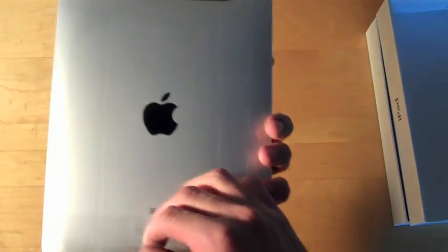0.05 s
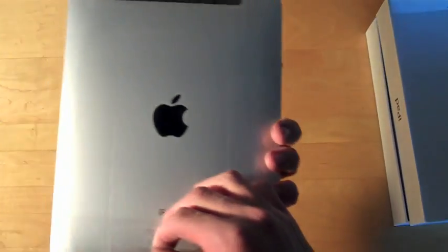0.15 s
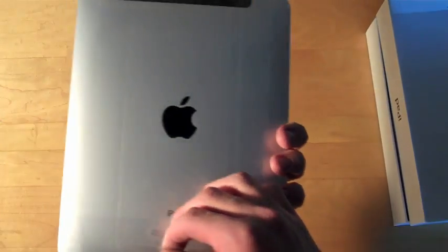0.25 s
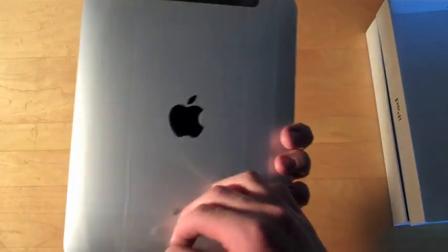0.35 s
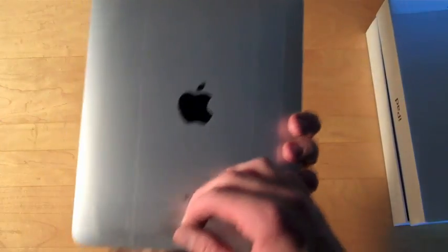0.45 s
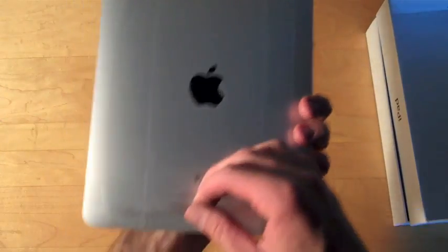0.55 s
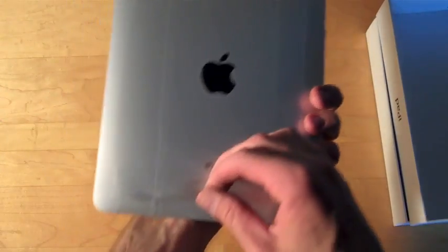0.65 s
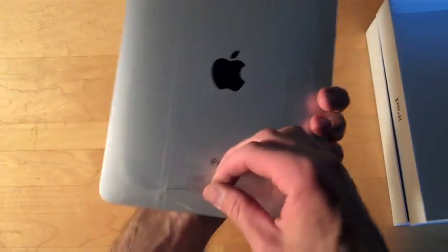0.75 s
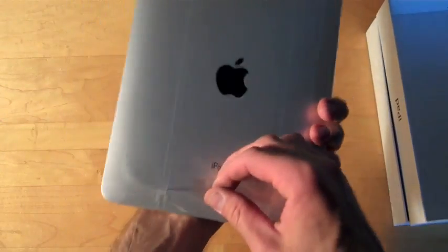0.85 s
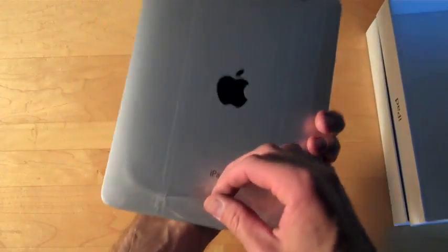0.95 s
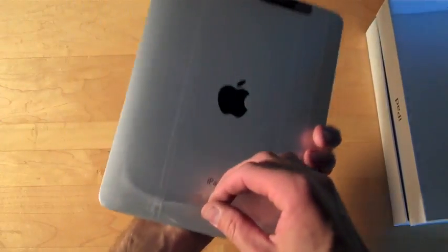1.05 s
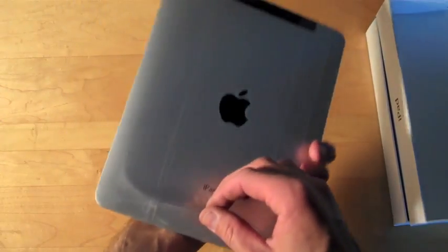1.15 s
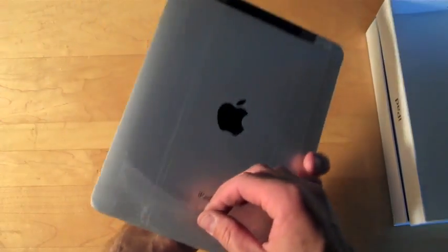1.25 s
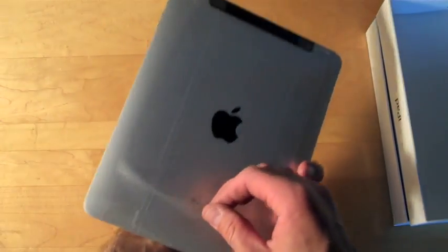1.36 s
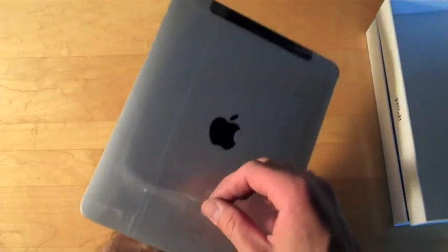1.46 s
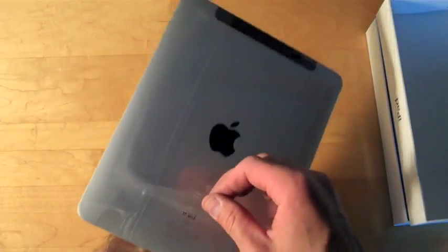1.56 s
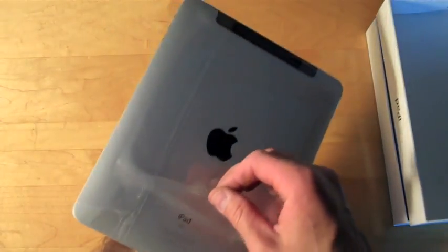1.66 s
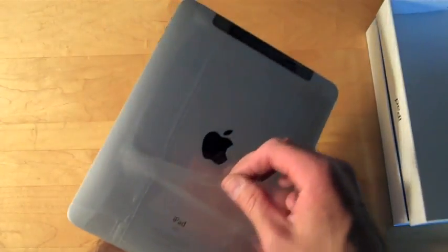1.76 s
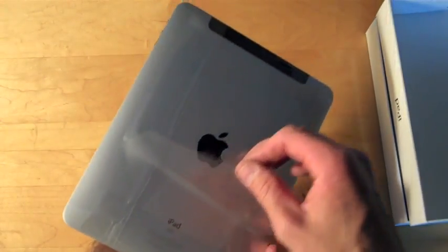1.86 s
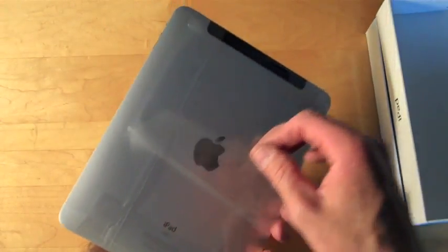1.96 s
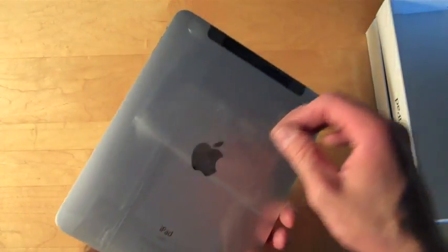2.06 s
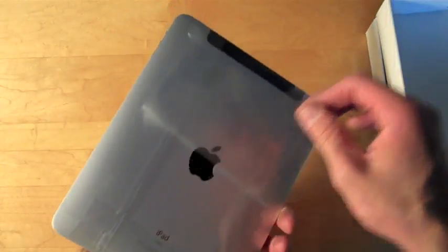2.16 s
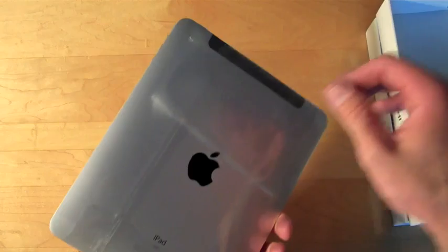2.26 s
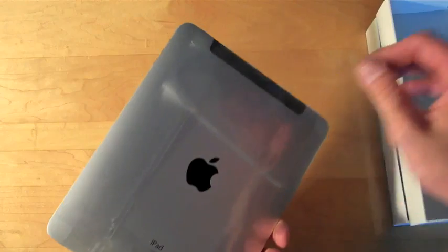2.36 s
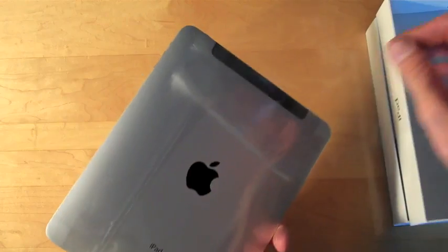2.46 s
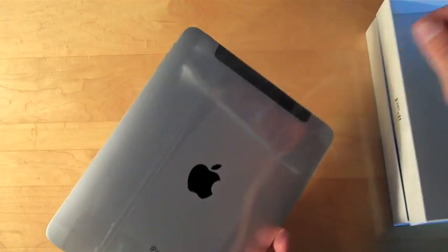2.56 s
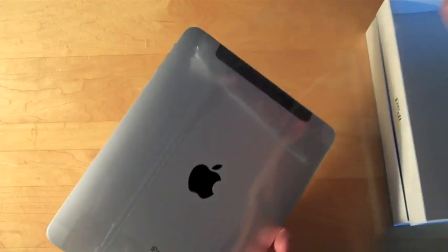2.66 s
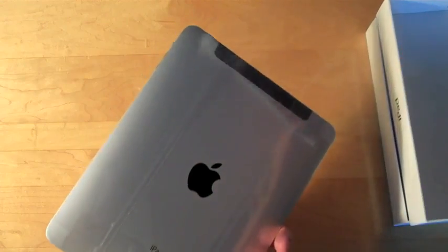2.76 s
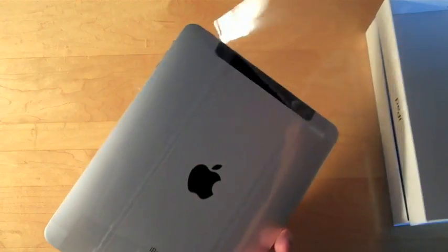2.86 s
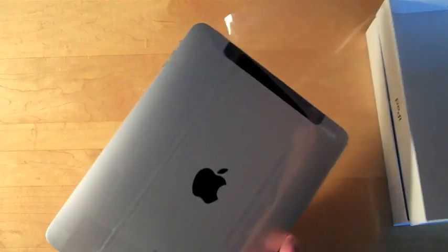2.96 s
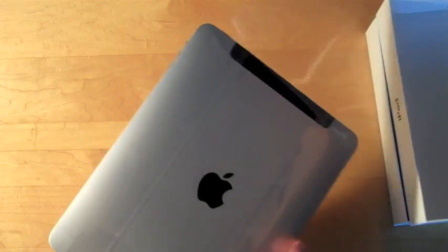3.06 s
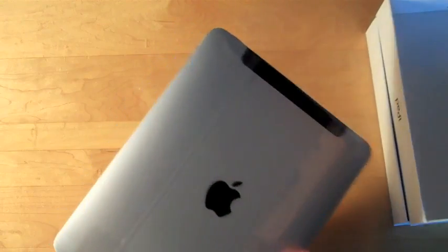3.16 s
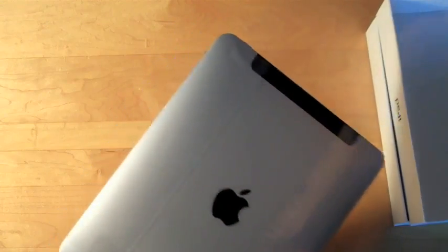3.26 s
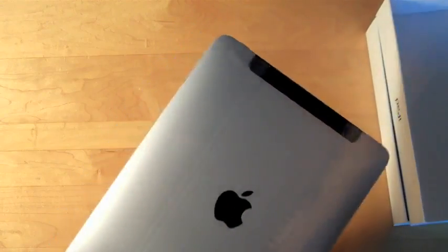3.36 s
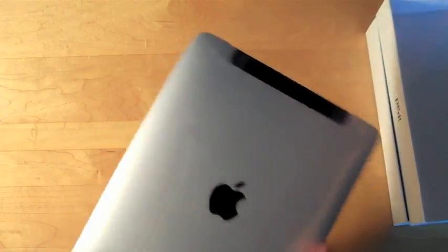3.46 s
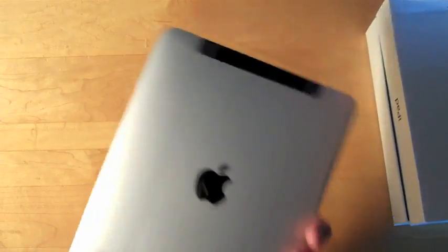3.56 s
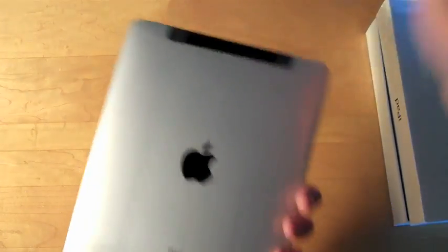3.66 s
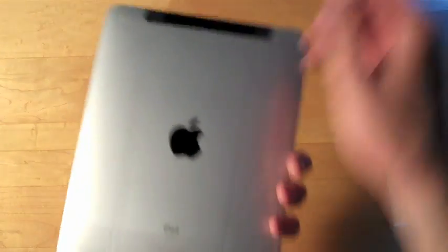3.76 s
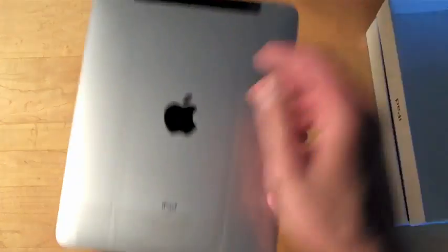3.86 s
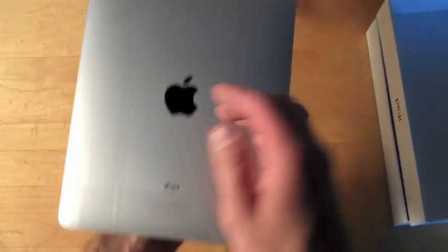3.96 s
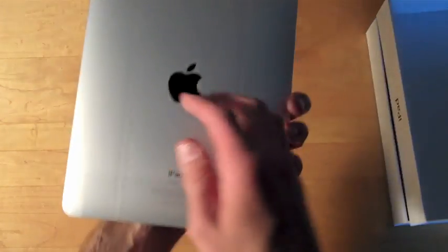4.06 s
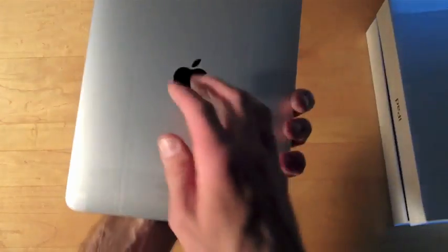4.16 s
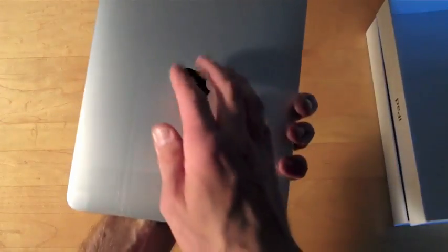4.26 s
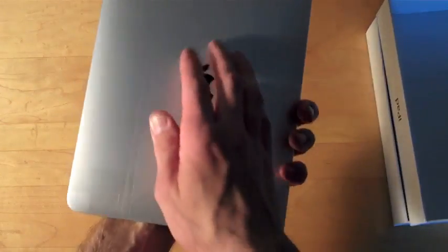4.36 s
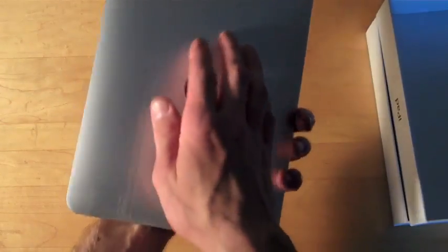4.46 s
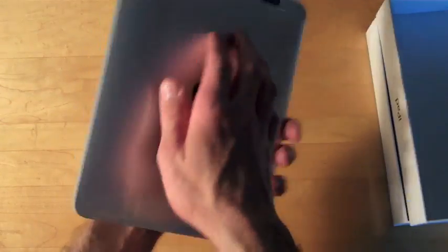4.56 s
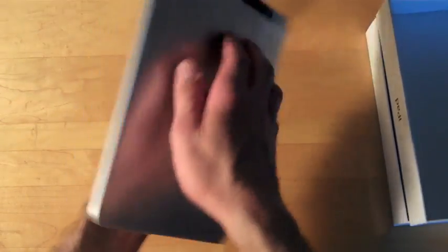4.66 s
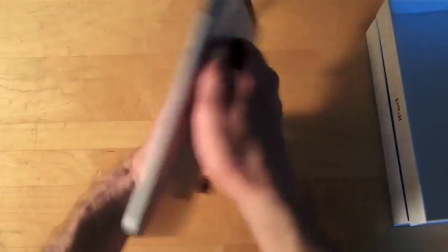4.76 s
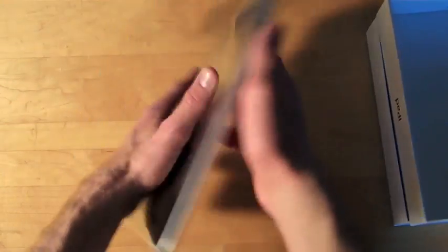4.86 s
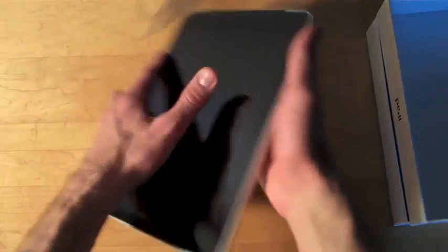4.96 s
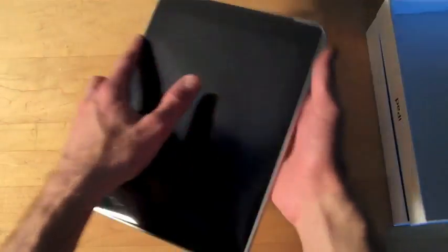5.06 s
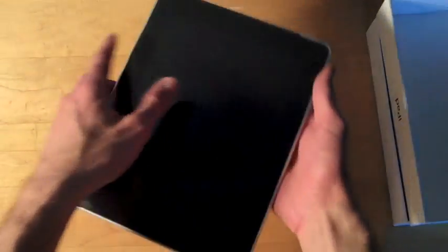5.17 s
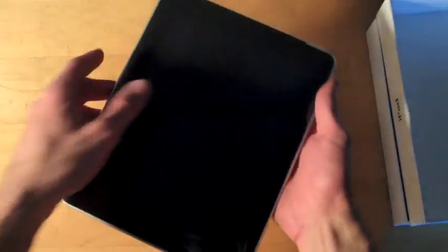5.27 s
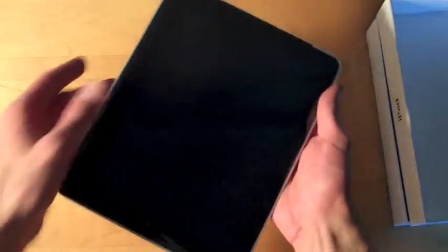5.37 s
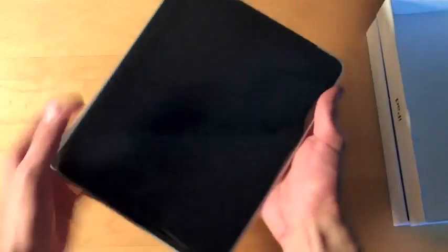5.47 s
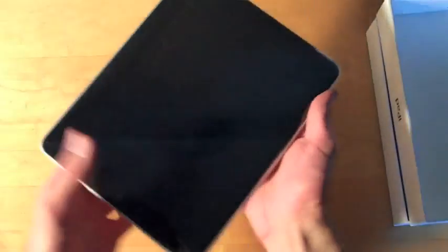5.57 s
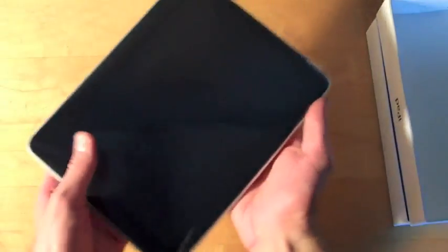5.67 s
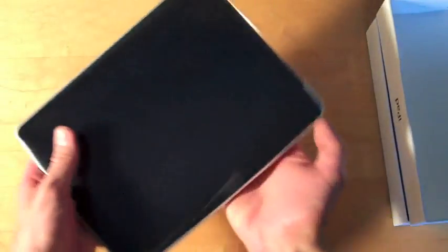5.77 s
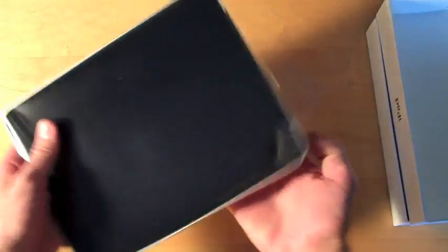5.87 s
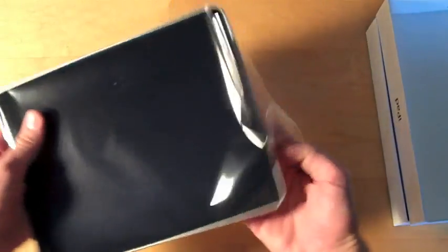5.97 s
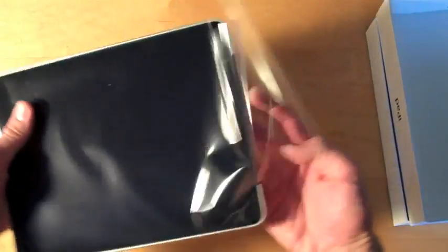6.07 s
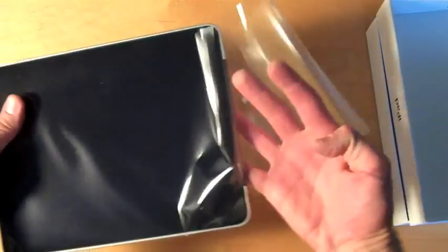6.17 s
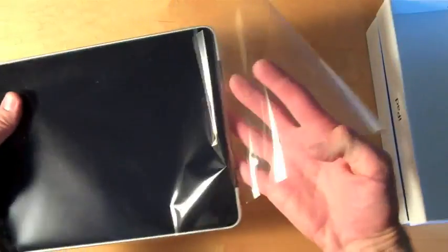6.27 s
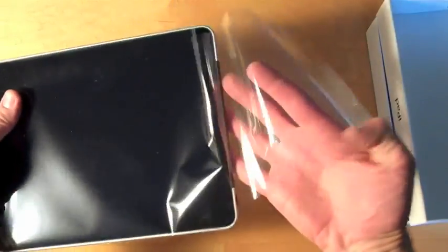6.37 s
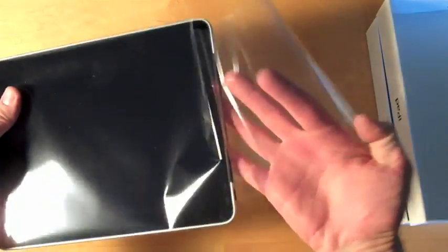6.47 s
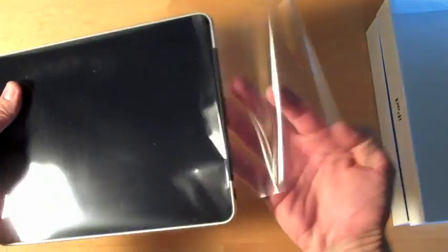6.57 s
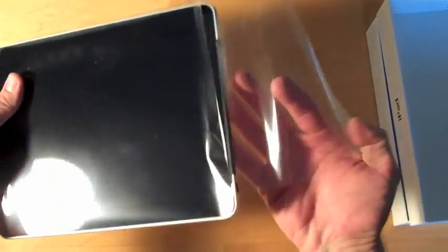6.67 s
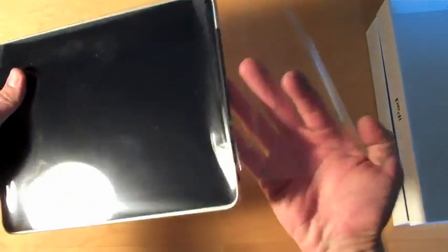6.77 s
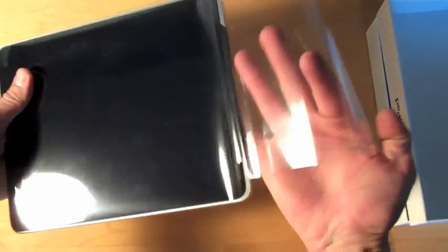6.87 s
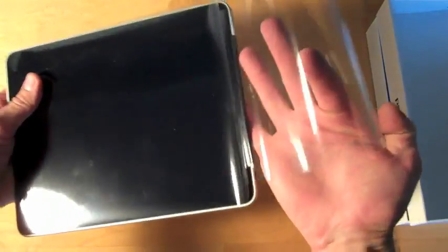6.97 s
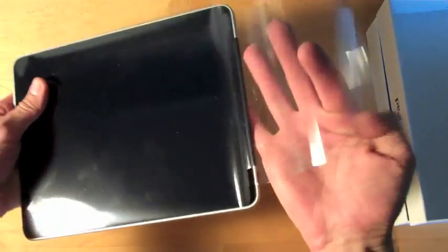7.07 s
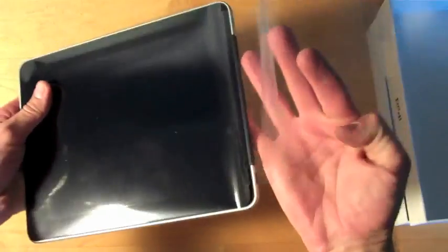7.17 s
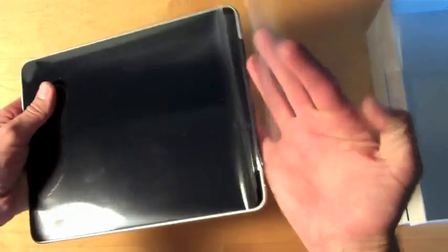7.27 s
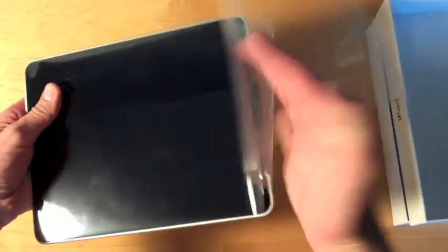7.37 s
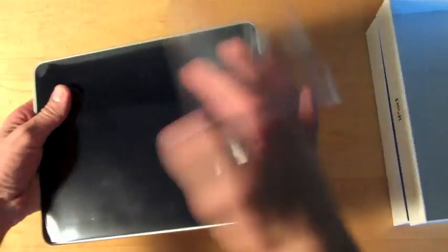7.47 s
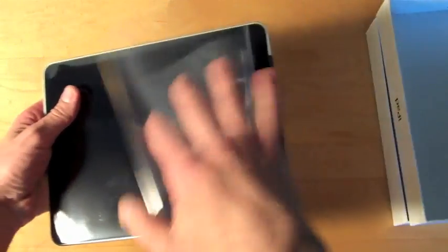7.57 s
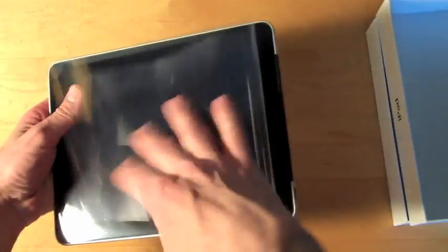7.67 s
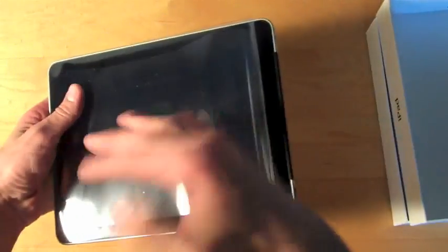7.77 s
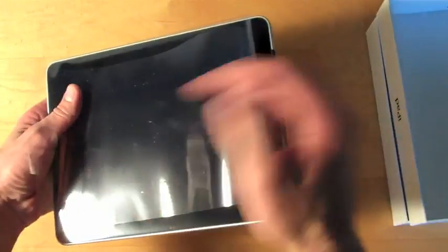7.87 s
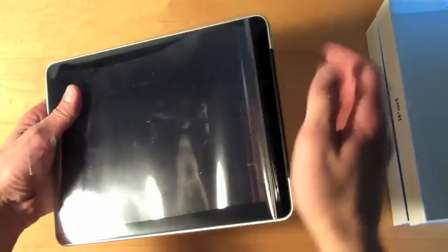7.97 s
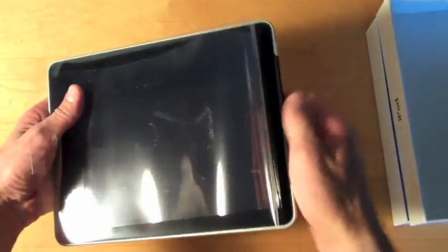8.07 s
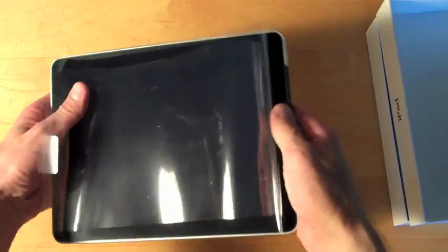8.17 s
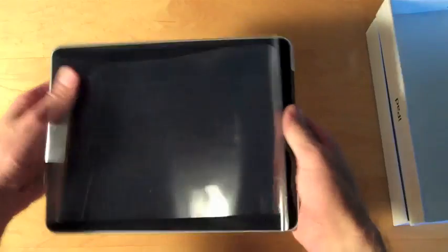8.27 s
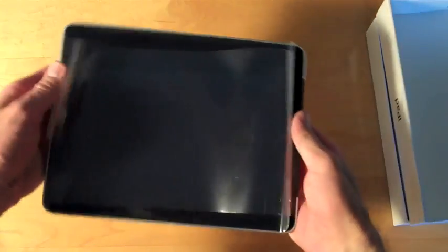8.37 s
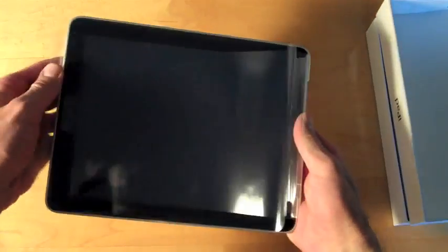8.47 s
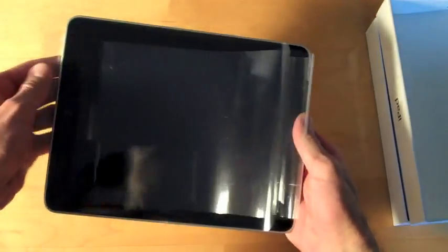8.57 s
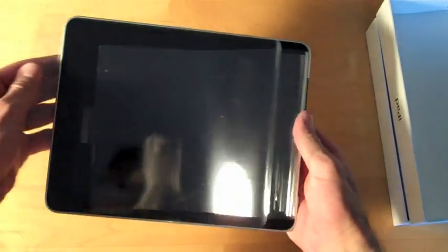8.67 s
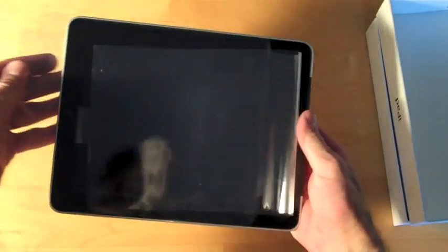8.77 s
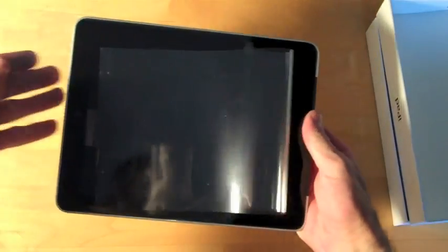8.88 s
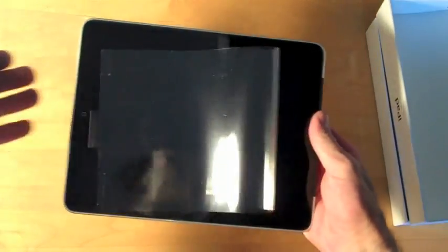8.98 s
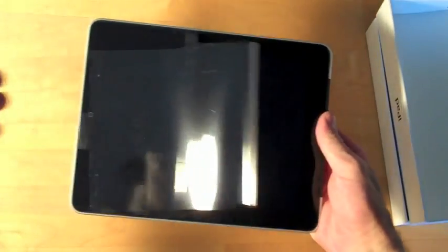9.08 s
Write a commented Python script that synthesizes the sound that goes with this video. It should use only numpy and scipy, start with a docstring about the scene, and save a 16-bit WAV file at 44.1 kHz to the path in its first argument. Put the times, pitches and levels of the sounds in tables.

```python
"""Close up in a small quiet room above a wooden desk, hands hold a tablet and its film begins to rustle and snap.
From 1.5 s the film peels away in quickening jerks, which join a hissing, singing pull until 3.2 s.
Then strokes of hand and film hiss and tick over the case, with dull grip rumble and grainy skin scuffs.
Throughout, creases buckle as ringing bursts of quick slips; now and then the whole sheet flaps with a hollow pop.
Hiss is noise made of tiny releases, coloured and swept by film resonances; echoes and a noise tail give the room."""
import sys
import numpy as np
from scipy import signal
from scipy.fft import rfft, irfft, next_fast_len
from scipy.io import wavfile
from scipy.ndimage import uniform_filter1d

SR = 44100
rng = np.random.default_rng(int(sys.argv[2]) if len(sys.argv) > 2 else 0)


def wav_out(sig):
    """Save sig, one row per channel (or a flat mono array), as 16-bit PCM at SR to the path in sys.argv[1]."""
    wavfile.write(sys.argv[1], SR, np.round(np.clip(np.atleast_2d(sig).T, -1, 1) * 32767).astype(np.int16))


N = 401751

# All levels are relative: layer trims, the room and the channel balance come on top.
# still room, noise spectrum: f/Hz, level/dB
QUIET_COLOUR = [(15, -15), (25, -0.5), (120, -3), (300, -6), (1200, -8.5), (5000, -12.5), (11000, -23),
                (16000, -61)]
QUIET_DB = -61.5
# decay of the room tail: f/Hz, t60/s
ROOM_DECAY = [(200, 0.25), (500, 0.6), (1400, 0.38), (4000, 0.25), (10000, 0.25)]
# echoes from desk and case: nominal delay/s, level/dB
ECHOES = [(.0019, -12), (.0046, -17), (.0058, -18)]
# steady resonances of desk and room: f/Hz, level/dB before scaling by frequency, t60/s
HOLLOW_MODES = [(351, -40, 0.54)]
# how unlike the film reaches the two channels: f/Hz, side level/dB
FILM_WIDTH = [(400, -23), (2000, -10.5), (9000, -6)]
# hands shifting their grip on the case: t/s, length/s, level/dB
GRIPS = [(0.0, 0.58, -63.5), (5.6, 0.078, -60.5), (8.604, 0.85, -65.5)]
# spectrum of the grip rumble: f/Hz, level/dB
GRIP_COLOUR = [(25, -11), (70, -3.5), (120, -4), (220, -10), (600, -42)]
# a fingertip dragging on the film: t/s, length/s, level/dB, pitch f/Hz
RUBS = [(0.508, .012, -45.5, 614), (3.887, 0.028, -47.5, 1410), (6.286, 0.021, -46.5, 1870),
        (6.778, 0.051, -47.5, 1680), (7.214, 0.053, -47, 1880), (7.328, 0.059, -46.5, 1530),
        (7.732, 0.037, -48, 1900), (8.482, 0.049, -47, 1410)]
# the whole sheet flapping: t/s, level/dB over 5 ms
FLAPS = [(2.299, -39), (2.797, -33), (2.877, -36.5), (3.2044, -18), (6.011, -36), (6.124, -28.5),
         (7.23, -43), (8.359, -43), (8.677, -43.5), (9.046, -44.5)]
# hollow modes of the flapping sheet: nominal f/Hz, level/dB, t60/s
SHEET_MODES = [(371, 7.5, 0.055), (438, 8.5, 0.063), (577, 5.5, 0.041), (1190, 7.5, 0.022)]
# tiny creases, single or in short runs: t/s, nominal level/dB over 5 ms, nominal ring f/Hz, length/s
CRINKLES = [(0.156, -45, 5600, .003), (0.428, -51, 5000, .012), (0.619, -46.5, 7000, .003),
            (0.685, -43.5, 4500, .018), (1.265, -42.5, 5400, .02), (1.297, -39, 3500, .012),
            (1.339, -51, 3000, .022), (2.769, -40.5, 3870, .012), (2.79, -33, 4700, .003),
            (3.499, -46.5, 5500, .0066), (3.736, -46.5, 4650, .005), (3.948, -48.5, 6150, .0071),
            (4.069, -42.5, 2680, .014), (4.16, -48, 4500, .006), (5.921, -46, 2300, .05),
            (5.98, -34.5, 2800, .003), (6.004, -38.5, 2300, .025), (6.053, -33, 1700, .003),
            (6.388, -44.5, 3300, .003), (7.206, -39.5, 3500, .003), (7.326, -45.5, 3500, .003),
            (7.644, -50.5, 2600, .009), (7.674, -47.5, 3500, .01), (7.745, -46.5, 3000, .021),
            (7.821, -35, 2400, .003), (8.226, -46.5, 2530, .003), (8.401, -43, 4850, .01),
            (8.427, -38.5, 6000, .003)]
# the film coming free in stick-slip jerks: t/s, nominal jerk level/dB over 5 ms
SLIPS = [(1.51, -60), (1.6, -51.5), (1.68, -49), (1.79, -59), (2.16, -50.5), (2.28, -41)]
FIRST_SLIPS_PER_S, SLIP_DOUBLING_S = 66, 0.32  # the rate of jerks doubles in this time
# resonances of the taut film, gliding as its free length changes: t/s, bright ring f/Hz, low bending f/Hz
FILM_PITCHES = [(1.66, 5380, 1675), (1.78, 6250, 1300), (2.17, 6530, 1200), (2.6, 7400, 884),
                (3.7, 4520, 1580), (5.9, 2820, 1350), (8.65, 4040, 613), (8.95, 8000, 547)]
# the film singing during the pull: t/s, bright ring level/dB, low bending level/dB
SINGING = [(1.62, -49, -54.5), (1.8, -60, -58.5), (2.18, -60, -52.5), (2.72, -59, -93)]
# the long pull that peels the back: t/s, hiss level/dB, flexing body/dB and fine fizz/dB relative to the hiss
PEEL = [(1.609, -58, -24, 1.5), (1.87, -56, -7, -5), (2.02, -43, -9.5, -4), (2.29, -46.5, -3, -9),
        (2.36, -49.5, -5, -8), (2.7, -49, -7.5, -6.5), (2.82, -48, 7.5, -3.5), (2.97, -57.5, -0.5, -9)]
PEEL_END_S = 3.2
# strokes of hand or film over the case: t/s, length/s, hiss level/dB, body/dB and fizz/dB relative to the hiss
STROKES = [(0.0, 0.44, -60.5, 5.5, -6), (0.454, 0.39, -58, 2.5, -5.5), (3.492, 0.49, -63, -1, 1),
           (3.637, 0.064, -52, -31, -6), (4.064, 0.07, -56, -3, -6), (4.32, 0.5, -66.5, 4, 3),
           (4.79, 0.093, -50.5, -5.5, -3), (4.987, 0.12, -57, 5, -8), (5.243, 0.1, -57, 0, -2),
           (5.576, 0.28, -63, -1, 2), (5.89, 0.042, -52.5, -0.5, -2.5), (5.924, 0.24, -48.5, 0.5, 1),
           (6.18, 0.44, -56.5, -3, -6.5), (6.67, 0.041, -50, -11, -4), (6.824, 0.15, -53, -9, -3),
           (7.116, 0.1, -51.5, -4, -6), (7.27, 0.57, -62.5, 1, -4), (8.152, 0.26, -58.5, -7, -0.5),
           (8.375, 0.3, -45.5, -19, -3), (8.727, 0.36, -49, -10, -2), (8.815, 0.24, -50, -44, 6.5)]
# a stroke takes hold over a share of its length, swells towards its middle and lets go
GRAB_SHARE, LET_GO_S, SWELL_DB = 0.028, 0.051, 2
# spectra of the sliding film's hiss, flexing body and fine fizz: f/Hz, level/dB
HISS_COLOUR = [(900, -20.5), (1600, -6.5), (3300, 0), (6200, 0), (7500, -8), (11000, -51.5)]
BODY_COLOUR = [(60, -33), (250, -2), (340, 0), (450, 1), (800, -6.5), (1150, -5), (1700, -9), (2600, -16),
               (5000, -74)]
FIZZ_COLOUR = [(4000, -28), (6200, -11), (7500, -5.5), (10000, -6), (12000, -12.5), (13500, -26),
               (16000, -48)]
# buckling creases: t/s, level/dB over 5 ms, facet ring f/Hz, low flex/dB, top edge/dB, length/ms (at least 0.5)
SNAPS = [(0.472, -20.5, 5200, -1, -1.5, 1.44), (0.7218, -20.5, 890, -13, -2.5, 1.57),
         (0.956, -36, 1050, -14.5, -8, 0.9), (1.287, -20, 940, -11, -8.5, 1.34),
         (1.3137, -28, 1380, -5.5, -18, 1.93), (1.3662, -17, 5400, -3, 0, 1.6),
         (2.297, -12, 4260, 1, -1.5, 1.63), (2.6398, -33.5, 5070, -0.5, 3, 0.5),
         (2.752, -29, 4870, 19.5, 7, 1.14), (2.9489, -26, 1290, -2, 3.5, 1.87),
         (3.0952, -28.5, 1190, -6, -5.5, 1.15), (3.1467, -22.5, 1790, 2.5, -1, 1.4),
         (3.2034, -14, 970, -4, -7, 1.85), (3.344, -35, 7600, 1, -26.5, 4.3),
         (3.3773, -37.5, 1000, -7, -20.5, 3.3), (4.7878, -21.5, 1680, -14.5, -11.5, 2.46),
         (4.9979, -32.5, 5900, 6.5, -28, 4.8), (5.059, -35.5, 1750, -9, -8.5, 3.5),
         (5.102, -42, 1950, 0, 2, 1.54), (6.0624, -25, 1280, -11.5, -25, 0.71),
         (6.1224, -14, 2970, -4, -8.5, 0.85), (6.2128, -32.5, 3240, 6.5, -21, 0.87),
         (6.4252, -34.5, 2220, 11, -16, 2.3), (6.4393, -27, 3860, -1, -10.5, 1.9),
         (6.576, -28.5, 1680, -16, -28, 0.55), (7.184, -38, 2970, 14, -14, 3.7),
         (7.811, -33.5, 2340, -0.5, -30, 2.5), (8.303, -39, 2030, -5, -3.5, 1.6),
         (8.3568, -34, 4120, 4, -2, 4.8), (8.621, -33, 3880, -1, -13, 0.56)]
# shared spectrum of giving creases: f/Hz, level/dB
SNAP_COLOUR = [(100, -25.5), (350, -7), (600, -13), (980, -5.5), (2500, -4), (5000, -1.5), (9000, -3.5),
               (12500, -12), (16000, -56)]
# a snapped crease springs back a moment later (at this delay or up to twice it): softer, slower, with more flex
REBOUND_S, REBOUND_DB, REBOUND_FLEX_DB, REBOUND_SLOWER = .0038, -14.5, 8.5, 1.6
EDGE_HZ = 15800  # upper band limit


def gain_of(db):
    """Decibels to a factor."""
    return 10 ** (np.asarray(db) / 20)


def evened(x):
    """Scales to rms 1."""
    return x / np.sqrt(np.mean(x ** 2) + 1e-20)


def read(points, hz):
    """Reads a curve on a log-frequency axis."""
    f, value = np.transpose(points)
    return np.interp(np.log(hz + 1), np.log(f + 1), value)


def peak(hz, centre_hz, width):
    """A resonance bump of height 1; width is its log-frequency half-width."""
    return 1 / (1 + (np.log((hz + 1) / centre_hz) / width) ** 2)


def add(mix, s, sound):
    """Adds a sound at time s."""
    part = mix[..., max(round(s * SR), 0):][..., :sound.shape[-1]]
    part += sound[..., :part.shape[-1]]


def coloured(x, points):
    """Filters x with a spectrum."""
    size = next_fast_len(N + 4096)
    gain = gain_of(read(points, np.fft.rfftfreq(size, 1 / SR)))
    return irfft(rfft(x, size) * gain, size)[..., :N]


def click(db):
    """The causal (minimum-phase) impulse that has this spectrum."""
    log_gain = np.log(gain_of(np.r_[db, db[-2:0:-1]]))
    return np.fft.ifft(np.exp(np.conj(signal.hilbert(log_gain)))).real


def at_level(x, db):
    """Scales a short sound to the energy of 5 ms at db."""
    return x * gain_of(db) * np.sqrt(.005 * SR / np.sum(x ** 2))


def spread(mid, side, width=FILM_WIDTH):
    """Two channels from a middle and a side signal whose strength varies with frequency."""
    side = coloured(side, width)
    return np.array([mid + side, mid - side])


def hand_clock(size=44):
    """Times, about 1 ms apart, at which the slow hand movements are followed."""
    return np.arange(0, N + size, size) / SR


def smooth(gain):
    """A gain on the hand clock, joined up for every sample."""
    return np.interp(np.arange(N) / SR, hand_clock(), gain)


def stroke(start, length):
    """Gain of one hand movement: attack, an arched hold, release."""
    t = hand_clock() - start
    u = np.clip(t / length, 0, 1)
    attack = np.sqrt(np.clip(u / GRAB_SHARE, 0, 1))
    arch = gain_of(-SWELL_DB * (2 * u - 1) ** 2)
    return attack * arch * np.exp(-np.clip((t - length) / LET_GO_S, 0, 20))


def resonate(x, hz, width_hz):
    """A steep two-pole resonance that can follow a pitch curve; rms 1."""
    turn = np.exp(2j * np.pi * np.cumsum(hz * np.ones(x.shape[-1])) / SR)
    r = np.exp(-np.pi * width_hz / SR)
    # shift the pitch down to zero, low-pass there, shift back up
    return evened((turn * signal.lfilter([1], np.poly([r, r]), x / turn)).real)


def releases(tick_share, ticks_per_s=500, size_db=6.5, tick_s=0.0028):
    """Noise from countless tiny releases; a few larger ones stand out as short ticks."""
    happens = rng.random(N) < ticks_per_s / SR
    sizes = gain_of(size_db * np.minimum(rng.exponential(1, N), 3.5)) * happens
    swell = signal.lfilter([1], [1, -np.exp(-1 / (tick_s * SR))], sizes ** 2)
    power = (1 + tick_share ** 2 * swell / swell.mean()) / (1 + tick_share ** 2)
    return np.sqrt(power) * rng.standard_normal((2, N))


def buckle(length_ms, grit=0.49, reach=1.2, count=4, size=2048):
    """A crease gives way in quick slips over a swelling, dying grit: a burst with an even spectrum, 2 ms in."""
    u = (np.arange(size) * 1000 / SR - 2).clip(0) / length_ms
    burst = grit * rng.standard_normal(size) * 2 * np.sqrt(u / length_ms) * np.exp(-u)
    jumps = (np.arange(count) + rng.uniform(-.5, .5, count)).clip(0) / (count - 1) * reach
    heights = np.sin(np.pi * np.arange(1, count + 1) / (count + 1))  # the middle slips are strongest
    at = np.searchsorted(u, jumps, "right").clip(0, size - 1)
    burst[at] += rng.choice([-1, 1], count) * heights
    z = rfft(burst)
    flat = z / np.sqrt(uniform_filter1d(abs(z) ** 2, 70) + 1e-9)
    return irfft(flat)[:size // 2]


def quiet():
    """Faint rumble and hiss of the still room: steady coloured noise."""
    noise = evened(coloured(rng.standard_normal((2, N)), QUIET_COLOUR))
    return gain_of(QUIET_DB) * spread(*noise, width=[(40, -5.5), (400, -5.5), (6000, 0.5)])


def room(x, scattered, near_db=-12, near_t60=0.3, tail_db=-15):
    """A few hard echoes of x; the scattered sound feeds a spray from the desk, a soft tail and hollow modes."""
    t = np.arange(SR // 2) / SR
    taps = rng.standard_normal((3, len(t))) * (rng.random((3, len(t))) < 6000 / SR)  # sparse reflections
    # both channels share the third row
    taps = (taps[:2] + taps[2]) * np.clip((t - .002) / 0.0025, 0, 1)
    hz, frame_s, z = signal.stft(taps, SR, nperseg=256)
    decay = gain_of(-60 * frame_s / read(ROOM_DECAY, hz)[:, None])
    tail = signal.istft(z * decay, SR, nperseg=256)[1][:, :len(t)]
    near = rng.standard_normal((2, len(t))) * gain_of(-60 * t / near_t60) * (t > .003)
    response = np.zeros((2, len(t)))
    for part, db in ((near, near_db), (tail, tail_db)):
        response += gain_of(db) * part / np.linalg.norm(part, axis=1, keepdims=True)
    for hz, db, t60 in HOLLOW_MODES:
        wave = np.sin(2 * np.pi * (hz * t + rng.random()))
        response += gain_of(db - 60 * t / t60) * wave * hz / SR * 2 * np.pi
    echoes = np.zeros_like(response)
    for delay, db in ECHOES:
        for side in echoes:
            add(side, delay * rng.uniform(0.74, 1.1), gain_of([db]))
    reflected = signal.fftconvolve(x, echoes, axes=1) + signal.fftconvolve(scattered, response, axes=1)
    return x + reflected[:, :N]


def grips():
    """Fingers shifting on the case: dull low noise under stroke-shaped gains."""
    rumble = evened(coloured(rng.standard_normal((2, N)), GRIP_COLOUR))
    gain = sum(gain_of(db) * stroke(start, length) for start, length, db in GRIPS)
    return spread(*rumble * smooth(gain))


def rubs(width_share=0.96, tick_share=2):
    """Skin drags over the film: a rounded, grainy scuff around one pitch."""
    grain, out = releases(tick_share), np.zeros((2, N))
    for s, length, db, hz in RUBS:
        arch = signal.windows.cosine(round(length * SR))
        scuff = resonate(grain[:, round(s * SR):][:, :len(arch)], hz, width_share * hz)
        add(out, s, gain_of(db) * arch * scuff)
    return spread(*out)


def flaps(push_db=-2, push_hz=300):
    """The sheet flaps: a brief push of air and the short hollow ring of its modes."""
    t, out = np.arange(SR // 5) / SR, np.zeros(N)
    push = gain_of(push_db) * np.cos(2 * np.pi * push_hz * t) * np.exp(-4 * push_hz * t)
    for s, db in FLAPS:
        pop = push.copy()
        for hz, mode_db, t60 in SHEET_MODES:
            detuned_hz = hz * rng.uniform(.96, 1.04)
            pop += gain_of(mode_db - 60 * t / t60) * np.sin(2 * np.pi * detuned_hz * t)
        add(out, s, at_level(pop, db))
    return signal.sosfilt(signal.butter(1, 330, "high", fs=SR, output="sos"), out)


def crinkles(ring_db=11, ring_width=0.73, dull_db=6, wander_oct=0.4, gap_s=0.0037, size=1024):
    """Small creases give way, alone as a soft tick or several in a short scuff around one pitch."""
    hz, out = np.fft.rfftfreq(size, 1 / SR), np.zeros((2, N))
    for s, db, ring_hz, length in CRINKLES:
        for start in np.arange(s, s + length, gap_s):
            late, pitch, strength = rng.uniform(-1.1, 1, 3)
            ring = peak(hz, ring_hz * 2 ** (wander_oct * pitch), ring_width)
            colour = read(SNAP_COLOUR, hz) + ring_db * ring
            # duller by the octave above the ring
            facet = click(colour - dull_db * np.log2(np.maximum(hz / ring_hz, 1)))
            for part in out:
                burst = signal.fftconvolve(buckle(1.9), facet)
                add(part, start + gap_s * (late - 1) / 2, at_level(burst, db + 4 * strength))
    return spread(*out)


def shivers(shiver_db=-20, t60=0.12, delay_s=0.0054, tick_share=1.7, mid_db=5, mid_hz=2400, mid_width=0.56):
    """A snap shakes the rest of the sheet, which settles in a dying, fine crackle."""
    t = hand_clock()
    power = sum((t > s + delay_s) * gain_of(db - 60 * abs(t - s) / t60) ** 2 for s, db, *_ in SNAPS)
    colour = [(hz, db + mid_db * peak(hz, mid_hz, mid_width)) for hz, db in SNAP_COLOUR]
    crackle = evened(coloured(releases(tick_share), colour))
    return spread(*crackle * gain_of(shiver_db) * smooth(np.sqrt(power)))


def slips(ring_db=11, ring_width=0.16, uneven_db=4, size=1024):
    """The pull starts in separate, uneven jerks that ring the taut film and tend to come ever faster."""
    hz, out = np.fft.rfftfreq(size, 1 / SR), np.zeros((2, N))
    times, levels = np.transpose(SLIPS)
    at, ring_hz, _ = np.transpose(FILM_PITCHES)
    s = times[0]
    for gap, strength in rng.uniform(-1, 1, (size, 2)):
        if s > times[-1]:
            break
        ring = peak(hz, np.interp(s, at, ring_hz), ring_width)
        film = click(read(SNAP_COLOUR, hz) + ring_db * ring)
        level = np.interp(s, times, levels) + uneven_db * strength
        for part in out:
            add(part, s, at_level(signal.fftconvolve(buckle(1), film), level))
        rate = FIRST_SLIPS_PER_S * 2 ** ((s - times[0]) / SLIP_DOUBLING_S)
        s += (1 + gap / 2) / rate
    return spread(*out)


def singing(ring_width_hz=1150, bend_width_hz=700, patchy_db=2):
    """The peel line excites the stretched film: two fuzzy, uneven bands that glide as it comes free."""
    t, out = hand_clock(), np.zeros((2, N))
    at, *pitches = np.transpose(FILM_PITCHES)
    s, *levels = np.transpose(SINGING)
    pulling = np.clip((t - s.min()) / LET_GO_S, 0, 1) * (t < s.max())
    for hz, db, width in zip(pitches, levels, (ring_width_hz, bend_width_hz)):
        patches = patchy_db * evened(uniform_filter1d(rng.standard_normal(len(t)), size=30))
        gain = gain_of(np.interp(t, s, db) + patches) * pulling
        band = resonate(rng.standard_normal((2, N)), smooth(np.interp(t, at, hz)), width)
        out += band * smooth(gain)
    return spread(*out)


def facets(x, patchy_db=2.5, ring_db=6, bend_db=6, width=1.0, size=1024):
    """The taut film rings at two gliding resonances; lesser ones wander in small patches."""
    hz, s, z = signal.stft(x, SR, nperseg=size)
    field = rng.standard_normal(z.shape[1:])
    for _ in range(2):
        field = uniform_filter1d(uniform_filter1d(field, 5, axis=0), 7, axis=1)
    at, ring_hz, bend_hz = np.transpose(FILM_PITCHES)
    db = patchy_db * evened(field)
    db += ring_db * peak(hz[:, None], np.interp(s, at, ring_hz), width)
    db += bend_db * peak(hz[:, None], np.interp(s, at, bend_hz), width)
    return signal.istft(z * gain_of(db), nperseg=size)[1][:, :N]


def slide(crackle=1.22, hiss_db=1.0, body_db=-2, fizz_db=-1):
    """The clinging film hisses as it peels and slides; the more it flexes, the more it ticks."""
    t = hand_clock()
    s, *columns = np.transpose(PEEL)
    level, body, fizz = (np.interp(t, s, db) for db in columns)
    pulling = np.clip((t - s[0]) / LET_GO_S, 0, 1) * np.clip((PEEL_END_S - t) / LET_GO_S, 0, 1)
    power = (pulling * gain_of([level, level + body, level + fizz])) ** 2  # rows: hiss, body, fizz
    for start, length, level, body, fizz in STROKES:
        power += gain_of([[level], [level + body], [level + fizz]]) ** 2 * stroke(start, length) ** 2
    flexing = np.minimum(power[1] / (power[0] + 1e-20), 1)
    tick_share = crackle * smooth(np.sqrt(np.sqrt(flexing)))
    out = np.zeros((2, N))
    colours, trims = (HISS_COLOUR, BODY_COLOUR, FIZZ_COLOUR), (hiss_db, body_db, fizz_db)
    for colour, db, gain in zip(colours, trims, np.sqrt(power)):
        layer = evened(coloured(facets(releases(tick_share)), colour))
        out += layer * gain_of(db) * smooth(gain)
    return spread(*out)


def snaps(ring_db=11.5, ring_width=0.24, scattered_ring_db=7, size=1024):
    """Each crease rings the facet of film around it, then rebounds, with its own low flex and bright edge.
    Returns the sound aimed at the microphone, and the smoother-coloured sound thrown all round the room."""
    hz, out, scattered = np.fft.rfftfreq(size, 1 / SR), np.zeros((2, N)), np.zeros(N)
    for s, db, ring_hz, flex_db, edge_db, length_ms in SNAPS:
        first = s, db, flex_db, length_ms
        back_s = s + REBOUND_S * 2 ** rng.random()
        rebound = back_s, db + REBOUND_DB, flex_db + REBOUND_FLEX_DB, length_ms * REBOUND_SLOWER
        ring = peak(hz, ring_hz, ring_width)
        for start, level, flex, ms in first, rebound:
            colour = read(SNAP_COLOUR, hz) + read([(1200, flex), (4000, 0), (10000, edge_db)], hz)
            facet = click(colour + ring_db * ring)
            for part in out:
                burst = signal.fftconvolve(buckle(max(ms, .5)), facet)
                add(part, start - .002, at_level(burst, level))  # the burst begins 2 ms in
            add(scattered, start, at_level(click(colour + scattered_ring_db * ring), level))
    return spread(*out), scattered


def scene(slide_room_share=0.85):
    """The film in the room, its sliding a little drier than its snaps; the left channel is the stronger."""
    sliding = slide() + singing()
    aimed, scattered = snaps()
    rustle = shivers() + crinkles() + rubs() + flaps() + slide_room_share * sliding
    film = room(aimed + rustle, scattered + rustle) + (1 - slide_room_share) * sliding
    balance_db = [[2.1], [-2.9]]  # left, right
    return (film + grips() + quiet() + slips()) * gain_of(balance_db)


def record(dry):
    """Peaks beyond full scale overload the input and clip; then the band limit."""
    low_pass = signal.firwin(255, EDGE_HZ, window=("kaiser", 9), fs=SR)
    return signal.oaconvolve(np.clip(dry, -1, 1), low_pass[None], "same")


dry = scene()
out = record(dry)
wav_out(out)
```